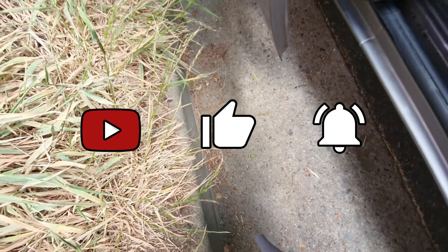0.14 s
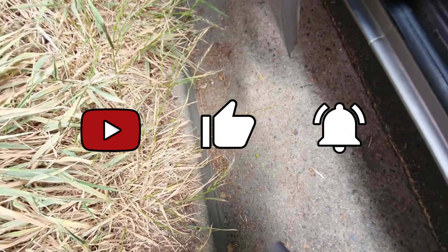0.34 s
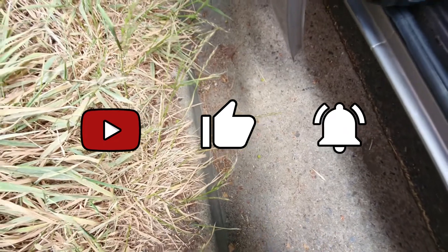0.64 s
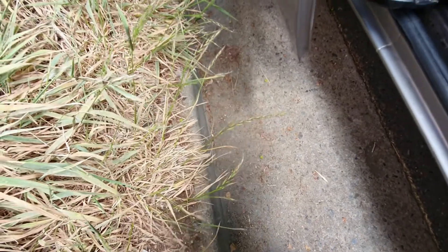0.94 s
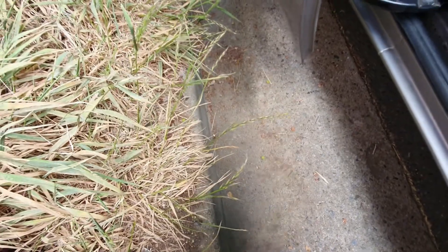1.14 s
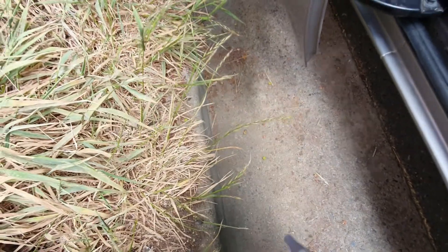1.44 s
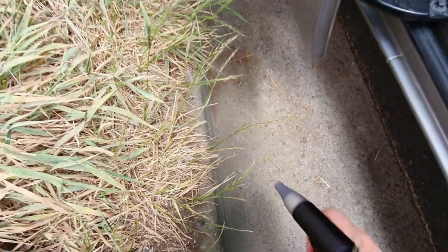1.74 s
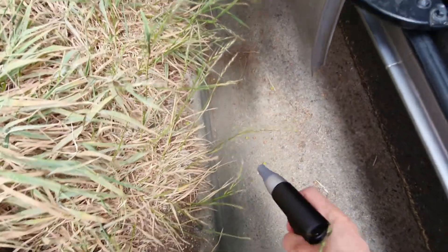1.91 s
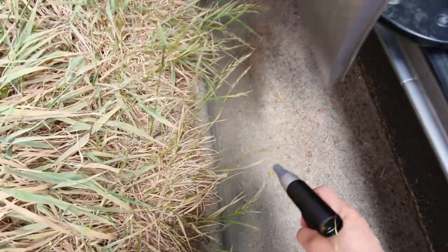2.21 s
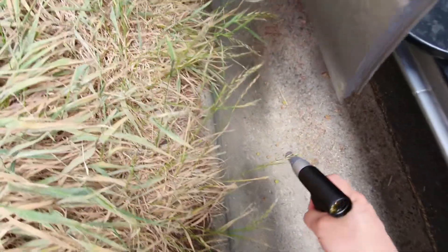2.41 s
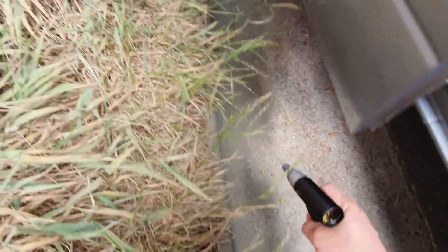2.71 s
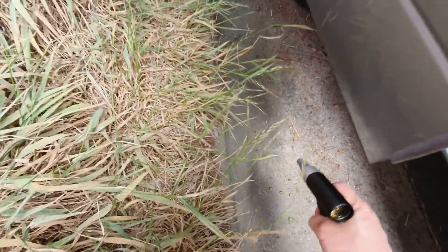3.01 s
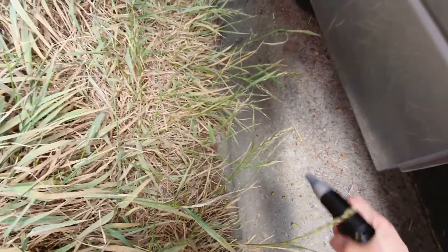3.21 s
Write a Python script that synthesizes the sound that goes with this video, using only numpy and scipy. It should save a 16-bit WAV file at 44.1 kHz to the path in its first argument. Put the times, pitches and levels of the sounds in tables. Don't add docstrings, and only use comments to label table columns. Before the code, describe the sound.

Handheld blower spins up from near quiet to a loud steady air rush with a piercing fan whine.

```python
import sys
import numpy as np
from scipy import signal
from scipy.io import wavfile
from scipy.ndimage import uniform_filter1d

SR = 44100
rng = np.random.default_rng(int(sys.argv[2]) if len(sys.argv) > 2 else 0)


def inscribe(sig):
    pcm = np.round(np.clip(np.atleast_2d(sig).T, -1, 1) * 32767)
    wavfile.write(sys.argv[1], SR, pcm.astype(np.int16))


def invert_db(x):
    u = np.asarray(x, float) / 20
    return 10 ** u


N = 147735

# start_s, left_port_lag_samples
SWEEP = [(.3, 6.4), (.9, 6.6), (1.27, 6.0), (1.6, 7.0), (1.7, 6.0), (1.88, 3.4), (2.02, 2.7), (2.16, 3.9),
         (2.3, 5.2), (2.5, 6.3), (2.6, 6.0), (2.73, 5.2), (2.87, 6.0), (3.07, 6.4), (3.2, 8.6), (3.35, 8.8)]
# pitch_hz, lead_radians
PORT_LEAD = [(200, .1), (600, -.75), (1250, -1), (2400, -.4), (4300, .05), (8200, .6), (10600, -.6),
             (15500, -.1)]


def evened(x):
    return x / np.sqrt(np.mean(x ** 2) + 1e-20)


def read(points, hz):
    table_hz, value = np.transpose(points)
    return np.interp(np.log(hz + 1), np.log(table_hz + 1), value)


def curve(points, t, axis=1):
    rows = np.array(points)
    return np.interp(t, rows[:, 0], rows[:, axis])


def bell(x, centre, width):
    return np.exp(-2 * ((x - centre) / width) ** 2)


def swell(t, start, length):
    return np.sin(np.pi * np.clip((t - start) / length, 0, 1)) ** 2


def wander(t, low_hz, high_hz):
    rates = np.geomspace(low_hz, high_hz, num=24)
    return evened(sum(np.sin(2 * np.pi * (f * t + rng.random())) / np.sqrt(f) for f in rates))


def patches(bins, frames, tall, long):
    grains = rng.standard_normal((frames, bins)).T
    return evened(uniform_filter1d(uniform_filter1d(grains, tall, axis=0), long, axis=1))


def noise(db, same, turn, size):
    a, b, c, d = rng.standard_normal((db.shape[2], db.shape[1], 4)).T
    same = np.clip(same, 0, 1)
    right = a + 1j * b
    left = same * right + np.sqrt(1 - same ** 2) * (c + 1j * d)
    spectra = np.array([left * np.exp(1j * turn), right]) * invert_db(db)
    sound = signal.istft(spectra, nperseg=size, noverlap=size - size // 4)[1]
    return sound[:, :N] / np.sqrt(size)


def air_flow(t, hz):
    # start_s, level_db, dullness_db_per_octave
    flow = [(.3, -69, 1), (.38, -60.5, -1), (.45, -35, 15), (.52, -26.5, 12), (.6, -20, 10), (.75, -16, 3),
            (.9, -14, 2.5), (1.1, -12.5, 0), (1.4, -13, 0.3), (1.75, -13.5, -1.6), (1.95, -14.5, -2),
            (2.4, -12.5, 1.1), (2.9, -14, 0), (3.35, -14.5, -1.7)]
    # pitch_hz, width_hz, left_db, right_db
    casing = [(1060, 420, 7.5, 1.5), (2180, 280, -6.5, -1), (2870, 1370, 0, 3), (4380, 630, 3.5, 3.5),
              (5690, 670, -1, 7), (6570, 330, -8, -0.5), (7020, 880, -5, 11.5), (8400, 350, 0, 5),
              (10050, 250, -4, 3), (10690, 1390, 7.5, 6), (12120, 410, 7.5, 5.5), (13450, 600, 12.5, -6),
              (1283, 67, 8, 2.5), (423, 140, -3.5, -4)]
    # pitch_hz, width_hz, level_db, first_breath_extra_db
    inlet = [(938, 170, 8, 12), (1720, 390, 2.5, 20), (2750, 840, 3, 10), (4580, 220, 6.5, -10),
             (6350, 700, 4.5, -10)]
    # pitch_hz, width_hz,
    # level_db
    duct = [(931, 50, 4), (2930, 50, 4), (5663, 70, 5), (7372, 60, 3), (7909, 50, 3), (8490, 40, 3),
            (10628, 60, 3), (12120, 90, 2), (12994, 100, 3), (14926, 60, 2), (15600, 450, 3)]
    octaves_above = np.log2(np.maximum(hz / 5900, 1))
    octaves_below = np.log2(np.clip(710 / (hz + 1), 1, 4))
    level = curve(flow, t) - curve(flow, t, axis=2) * (octaves_above + 0.34 * octaves_below)
    level = level + sum(np.array([l, r])[:, None, None] * bell(hz, f, w) for f, w, l, r in casing)
    full_s, fade_s = 0.55, 0.99
    young = np.clip(1 - (t - full_s) / fade_s, 0, 1)
    first_breath = bell(t, .4, .06)
    for f, w, db, first_db in inlet:
        level += (db * young + first_db * first_breath) * bell(hz, f, w)
    for f, w, db in duct:
        level += db * (1 + .5 * wander(t, 0.47, 4.5)) * bell(hz, f, w)
    return level


def jet():
    # pitch_hz, level_db_per_hz
    jet_colour = [(200, -16.5), (330, -14.5), (650, -2), (1100, -1), (1900, -3.5), (2500, 8.5), (4000, 2),
                  (15800, 0.5)]
    # pitch_hz, left_minus_right_db
    port_pan = [(200, 1.5), (650, -6.5), (1300, -11), (2000, 2), (4500, -5), (7000, 14.8), (11000, -6.5),
                (15500, -9)]
    # pitch_hz, likeness_0_to_1
    port_same = [(200, .45), (600, .8), (1200, .8), (1700, .68), (2900, .86), (6000, .55), (11000, .66),
                 (15500, .5)]
    size, hop = 1024, 256
    t = np.arange(N // hop + 5) * hop / SR
    hz = np.fft.rfftfreq(size, 1 / SR)[:, None]
    bins, frames = len(hz), len(t)
    ports = np.array([.5, -.5])[:, None, None] * read(port_pan, hz)
    drift = 0.98 * patches(bins, frames, tall=14, long=45) + 0.3 * patches(bins, frames, tall=16, long=6)
    ripple = 2.18 * patches(bins, frames, tall=2, long=30)
    gusts = 0.5 * wander(t, 2.48, 30) + .5 * patches(bins, frames, tall=160, long=2)
    level = read(jet_colour, hz) + ports + air_flow(t, hz) + drift + ripple + gusts
    lead = read(PORT_LEAD, hz) - 2 * np.pi * hz * curve(SWEEP, t) / SR
    return noise(level, read(port_same, hz), lead, size=size)


def fan():
    # start_s, turns_per_second_hz
    shaft_speed = [(.33, 330), (.55, 610), (.7, 810), (.79, 920), (.88, 1006), (.98, 1095), (1.06, 1165),
                   (1.12, 1175.5), (1.3, 1176.9), (1.47, 1175.9), (1.75, 1177), (2.1, 1175), (2.25, 1175.3),
                   (2.7, 1174.3), (2.85, 1175.8), (3.1, 1175.3), (3.35, 1172.5)]
    # shaft_multiple, left_db, right_db, waver_db, wobble_boost_db, wobble_at_shaft_hz
    tones = [(1, -29.5, -26, 1.4, 2, 1040), (2, -43, -41, 1.5, 24, 980), (3, -46, -41, 3, 0, 975),
             (4, -56, -48, 1, 34, 945), (6, -40, -39, 3, 0, 975), (7, -44, -50, 3, 5, 975),
             (9, -48, -48, 3, 0, 975), (10, -53, -50, 3, 0, 975), (13, -1, -1, 1.2, 0, 975)]
    # start_s, left_db, right_db
    blade_whine = [(.58, -60, -55), (.7, -40, -29), (.8, -39, -29), (.92, -36, -29), (1.0, -28, -32),
                   (1.2, -24, -27), (1.28, -29, -27), (1.35, -19, -28), (1.49, -21, -29), (1.56, -27, -26),
                   (1.7, -21, -25), (1.82, -24, -29), (1.91, -28, -38), (1.98, -22, -33), (2.12, -18, -25),
                   (2.26, -20, -28), (2.38, -26, -28), (2.47, -22, -25), (2.56, -24, -29), (2.68, -18, -25),
                   (2.82, -25, -29), (2.89, -19, -27), (2.96, -23, -31), (3.03, -18, -28), (3.17, -23, -29),
                   (3.24, -32, -28), (3.35, -27, -39)]
    # start_s, right_db, left_lead_radians
    shaft_turn = [(.85, -1, .6), (1.1, -6, .7), (1.4, -5, .4), (1.6, 1, 0), (1.85, 2, 0), (2.0, -1.5, -.4),
                  (2.3, 2, -.7), (2.6, 0, -.4), (3.05, 3, -.6), (3.35, 0, -.3)]
    blades = 13
    t = np.arange(N) / SR
    hz = uniform_filter1d(curve(shaft_speed, t), size=2000) + .1 * wander(t, 3.5, 25)
    angle = 2 * np.pi * np.cumsum(hz) / SR
    start = np.clip((t - shaft_speed[0][0]) * 5, 0, 1)
    growth = (hz / shaft_speed[-1][1]) ** 5
    whine = invert_db([curve(blade_whine, t), curve(blade_whine, t, axis=2)])
    out = np.zeros((2, N))
    for k, left_db, right_db, waver_db, wobble_db, wobble_hz in tones:
        lead = read(PORT_LEAD, k * hz) - 2 * np.pi * k * hz * curve(SWEEP, t) / SR
        lead = lead + curve(shaft_turn, t, axis=2) * (k == 1)
        boost = wobble_db * bell(hz, wobble_hz, 85)
        boost = boost + waver_db * wander(t[::64], 1.5, 25).repeat(64)[:N]
        strength = whine if k == blades else growth
        level = np.sqrt(2) * start * strength * invert_db(uniform_filter1d(boost, size=64))
        level = level * invert_db([0 * t, curve(shaft_turn, t) * (k == 1)])
        out += level * invert_db([[left_db], [right_db]]) * np.sin([k * angle + lead, k * angle])
    return out


def switch_tick():
    t = np.arange(N) / SR
    start_s, level_db, fall_60_db_s = .317, -60, .03
    fall = invert_db(level_db - 60 * abs(t - start_s) / fall_60_db_s) * (t > start_s)
    return fall * signal.lfilter([1, 0, -1], [1, -.9, .5], rng.standard_normal(N)) / 2


def hand_bump():
    t = np.arange(N) / SR
    start_s, length_s, pitch_hz, level_db = 0.512, 0.068, 64.2, -23.5
    return invert_db(level_db) * swell(t, start_s, length_s) * np.sin(2 * np.pi * pitch_hz * t)


def insect():
    # start_s, level_db
    trill_swell = [(0, -15), (.05, -8.5), (.18, -3), (.3, 2), (.318, 10), (.34, -3), (.45, 14), (3.35, .1)]
    t = np.arange(N) / SR
    pitch_hz, width_hz, strokes_per_s, level_db = 6820, 260, 60, -58.5
    stroke = np.cumsum(strokes_per_s * (1 + 0.097 * wander(t, 1.9, 39))) / SR % 1
    trill = (.4 + np.exp(-stroke / .25)) * rng.standard_normal((N, 2)).T
    r = np.exp(-np.pi * width_hz / SR)
    for _ in range(2):
        trill = signal.lfilter([1], [1, -2 * r * np.cos(2 * np.pi * pitch_hz / SR), r * r], trill)
    return invert_db(level_db + curve(trill_swell, t)) * evened(trill)


def far_whistles():
    # start_s, length_s, pitch_hz, level_db
    whistle_notes = [
        (0.07, 0.14, 1505, -65),
        (.21, 0.11, 1460, -65),
        (.06, .12, 2250, -71),
    ]
    t = np.arange(N) / SR
    return sum(invert_db(db) * swell(t, s, length) * np.sin(2 * np.pi * hz * t) for s, length, hz, db in whistle_notes)


def yard():
    # pitch_hz, level_db_per_hz
    hiss_colour = [(150, -8.5), (430, -11.5), (1360, -18.5), (2300, -22), (4500, -29), (7000, -31),
                   (9000, -53), (15800, -42)]
    # pitch_hz, level_db_per_hz
    rumble_colour = [(20, -48), (42, -16), (52, 1), (66, 1.3), (90, -11.5), (125, -11), (165, -26.5),
                     (300, -30.5)]
    # start_s, level_db
    traffic = [(0.0, -45), (0.46, -45.5), (0.56, -39), (0.62, -43), (0.89, -42), (0.91, -52.5),
               (1.44, -43.5), (2.18, -48), (2.35, -40.5), (2.46, -50.5), (2.78, -36), (2.95, -49),
               (3.18, -44), (3.35, -48)]
    size, hop = 2048, 512
    frames = N // hop + 5
    hz = np.fft.rfftfreq(size, 1 / SR)[:, None]
    both = np.zeros((2, 1, frames))
    grain = 2.1 * patches(len(hz), frames, tall=12, long=6)
    hiss = noise(both + read(hiss_colour, hz) + grain, 0.057, 0, size=size)
    lumps = 0.8 * wander(np.arange(frames) * hop / SR, 1.37, 10.0)
    steep = read(rumble_colour, hz) - 30 * np.log2(np.maximum(hz / rumble_colour[-1][0], 1))
    rumble = noise(both + steep + lumps, 0.94, 0, size=size)
    return invert_db(-59.5) * evened(hiss) + invert_db(curve(traffic, np.arange(N) / SR)) * evened(rumble)


def scene():
    return jet() + fan() + switch_tick() + hand_bump() + insect() + far_whistles() + yard()


def top_cut(x):
    return signal.sosfilt(signal.butter(12, 15830, fs=SR, output="sos"), x)


def record(dry):
    ceiling = .78
    return top_cut(np.clip(dry, -ceiling, ceiling))


dry = scene()
out = record(dry)
inscribe(out)
```